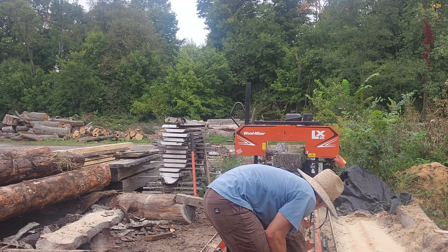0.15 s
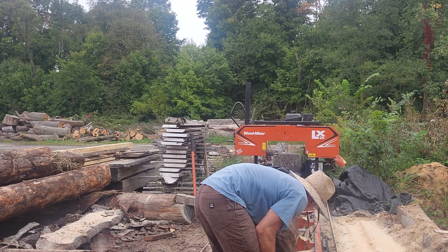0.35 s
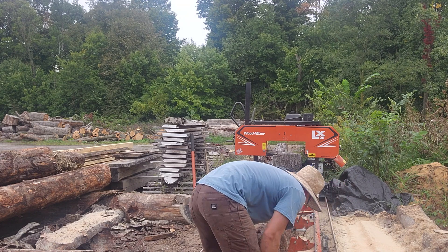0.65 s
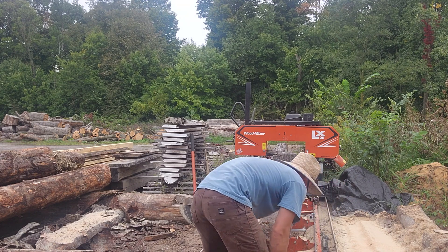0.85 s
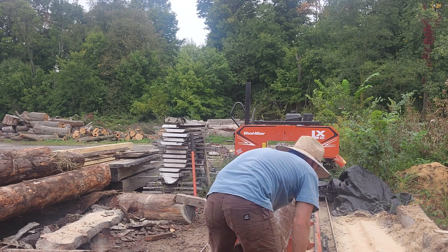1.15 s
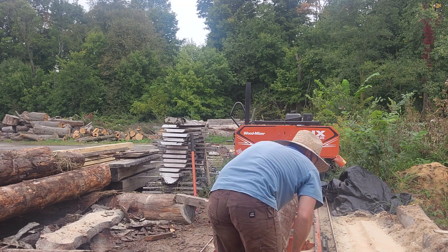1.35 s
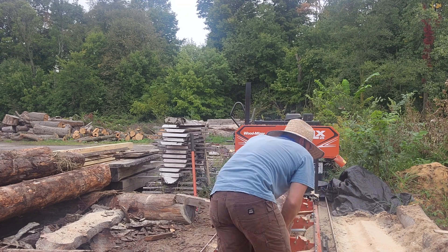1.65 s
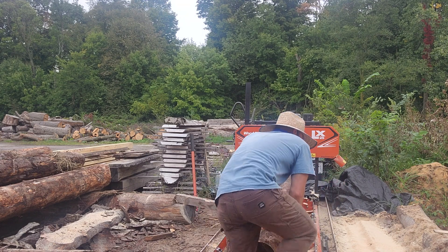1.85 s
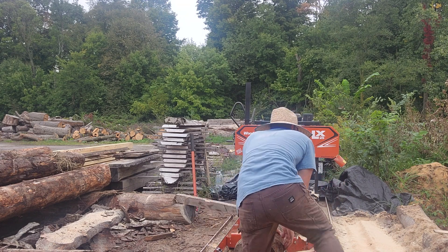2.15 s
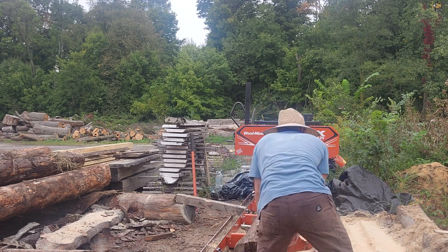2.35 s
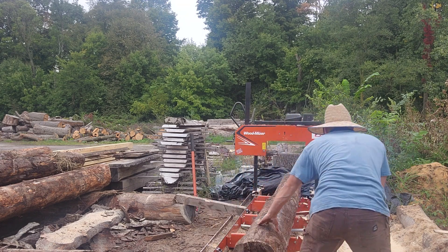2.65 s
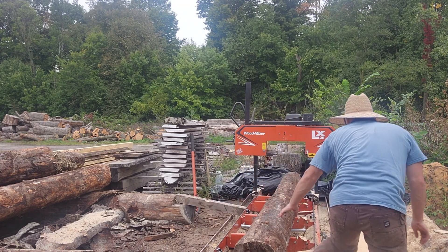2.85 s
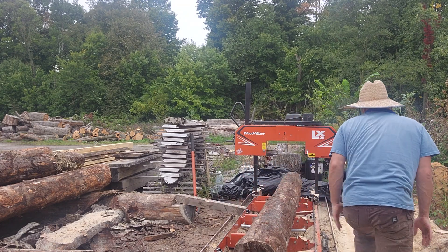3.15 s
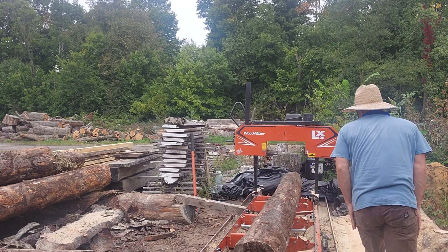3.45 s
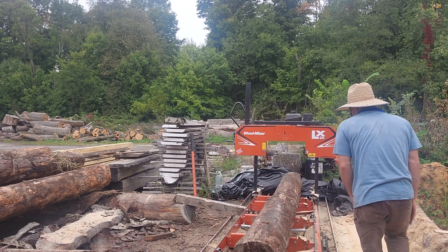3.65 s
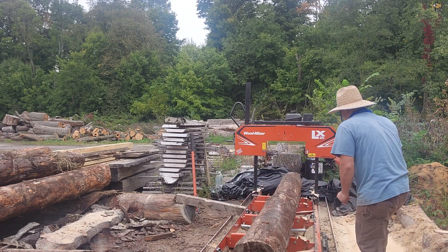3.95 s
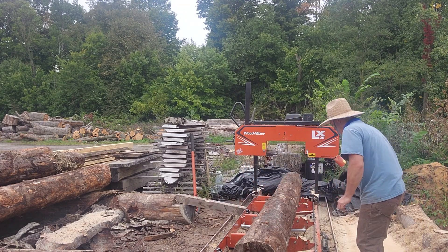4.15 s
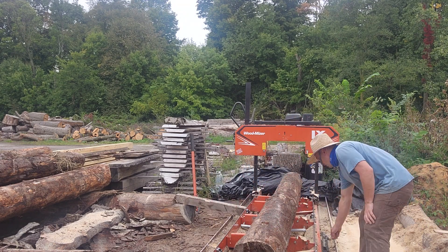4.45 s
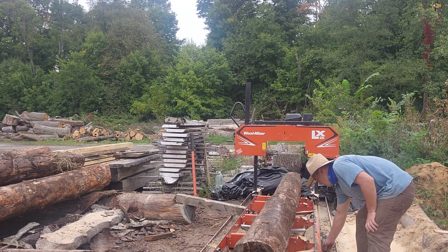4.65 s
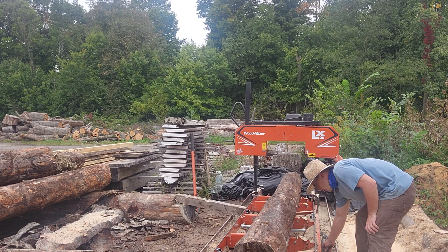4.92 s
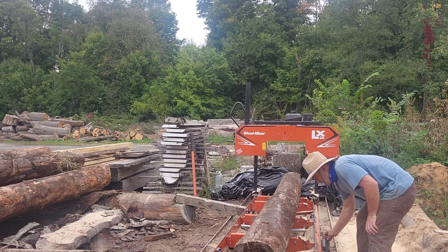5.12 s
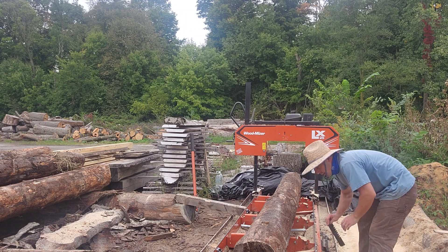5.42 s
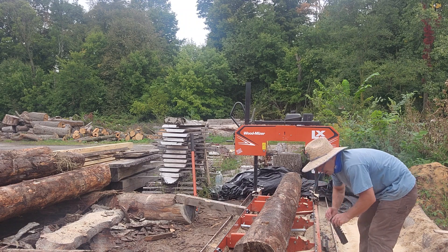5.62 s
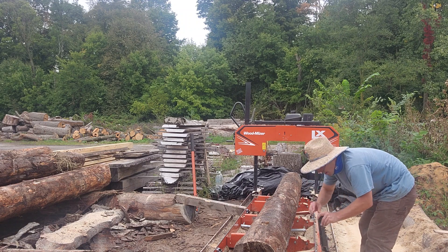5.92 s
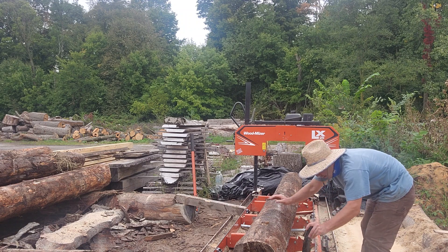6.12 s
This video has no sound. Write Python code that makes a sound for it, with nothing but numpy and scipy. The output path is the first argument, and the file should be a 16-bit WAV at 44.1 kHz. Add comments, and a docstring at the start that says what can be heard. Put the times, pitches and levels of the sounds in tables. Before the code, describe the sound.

In an open yard with soft short echoes, bark scuffs and knocks on steel rails, then a log drops with a single dominant low thud, followed by a crunchy grind and a few rocking bumps. Quieter handling follows: a dull double bump, small metal ticks and dry scuffs. Steady insect shimmer, a nearer pulsing cricket, sparse thin bird seeps and distant rumble surround it; falling chirps come near the end. The microphone is near the log.

```python
"""In a wooded sawmill yard a heavy log is rolled over and drops on the steel bed.
Landings push the damped modes of log and bed into a boom; bark catching on the cross rails grinds,
steel parts knock through modes of their own, and rubbing is grit ringing broad bark resonances under a hiss.
Insects are pulsed tones over noise bands, a near cricket trills, two small birds sing gliding sines,
and a far low rumble is shaped noise."""
import sys
import numpy as np
from scipy import signal
from scipy.fft import rfft, irfft
from scipy.io import wavfile

SR = 44100
rng = np.random.default_rng(int(sys.argv[2]) if len(sys.argv) > 2 else 0)


def ratio(d):
    """dB to gain"""
    e = np.asarray(d, float) / 20
    return 10 ** e


def int16_out(signal):
    """Quantize to a 16-bit WAV file."""
    q = np.round(np.clip(np.atleast_2d(signal).T, -1, 1) * 32767)
    wavfile.write(sys.argv[1], SR, q.astype(np.int16))


N = 276948
TIME = np.arange(N) / SR

# Modes of log and bed frame. Each row: frequency in Hz, relative level in dB,
# free decay time to -60 dB in seconds.
BED = [(51.5, 3, 0.31), (65.1, 1.5, 0.57), (89.8, -3, 0.55), (111.3, 6.5, 0.11), (166, 6, 0.066),
       (200.7, -1, 0.13), (287, -16.5, 0.81), (343, -6, 0.17), (416.5, -16, 0.43), (549, -12.5, 0.066)]
# Modes of rails and clamps. Each row: frequency in Hz, relative level in dB,
# free decay time to -60 dB in seconds.
RAILS = [(770, -4, 0.089), (1050, -15, 0.044), (1110, 1, 0.12), (1260, -2.5, 0.049), (1372, -5, 0.1),
         (1550, -6.5, 0.065), (2150, -3, 0.045), (2284, -6.5, 0.037), (3700, -4, 0.036), (4980, -3.5, 0.12)]
HELD = 0.5   # parts in contact damp each other: share of the rails' free decay time


def rms_one(x):
    """Normalisation to unit root-mean-square."""
    return x / np.sqrt(np.mean(x ** 2) + 1e-20)


def at_hz(points, hz):
    """Spectrum interpolated in dB along a logarithmic frequency axis."""
    point_hz, point_value = np.array(points).T
    return np.interp(np.log(hz), np.log(point_hz), point_value)


def drift(rate_hz):
    """Random modulation of unit spread: white noise through a critically damped low-pass."""
    step = 40   # samples between computed values
    r = np.exp(-2 * np.pi * rate_hz * step / SR)
    slow = signal.lfilter([1], [1, -2 * r, r * r], rng.standard_normal(N // step + 2002))
    slow = slow[2000:]   # the filter has settled
    return np.interp(np.arange(N) / step, np.arange(len(slow)), rms_one(slow - slow.mean()))


def ring(force, hz, t60):
    """Damped resonator: a unit click sets off a decaying sine of height 1; t60 in seconds."""
    r = ratio(-60 / (t60 * SR))
    w = 2 * np.pi * hz / SR
    return signal.lfilter([0, np.sin(w)], [1, -2 * r * np.cos(w), r * r], force + 1e-18)


def band(x, low_hz, high_hz):
    """Band-pass filtering by a Butterworth response."""
    sos = signal.butter(2, [low_hz, high_hz], "band", fs=SR, output="sos")
    return signal.sosfilt(sos, x)


def placed(x, pan_db, lag_s):
    """Stereo by level and time difference: left is pan_db stronger, right comes lag_s later."""
    right = np.interp(TIME - lag_s, TIME, x)
    return np.array([x * ratio(pan_db / 2), right * ratio(-pan_db / 2)])


def banded_noise(spectrum, patchy_db, patch_rate_hz, count):
    """Diffuse field: noise bands with partial left-right coherence and fluctuating levels; mid rms 1."""
    # Left-right likeness. Each row: frequency in Hz, likeness from 0 to 1.
    likeness = [(130, 0.97), (400, 0.87), (700, 0.063), (1500, 0.72), (4000, 0.045)]
    # Spectral balance of the channels. Each row: frequency in Hz, left over right in dB.
    leaning = [(200, .3), (400, 1.5), (800, 0), (2200, 1.5), (4900, -1.5), (9400, 4), (13000, 3)]
    edges = np.geomspace(spectrum[0][0], spectrum[-1][0], count + 1)
    hz = np.fft.rfftfreq(N, 1 / SR) + 0.0011   # keeps the logarithm finite
    alike = np.clip(at_hz(likeness, hz), 0, 1)
    mid, side = rfft(rng.standard_normal((2, N))) * ratio(at_hz(spectrum, hz))
    pair = np.sqrt(1 + alike) * mid + np.sqrt(1 - alike) * side * [[1], [-1]]
    pair *= ratio(at_hz(leaning, hz) * [[0.5], [-0.5]])
    pair[1] *= np.exp(-2j * np.pi * hz * 0.00019)   # right channel 0.19 ms later
    together = drift(patch_rate_hz / 2)
    out = np.zeros((2, N))
    for low, high in zip(edges, edges[1:]):
        flicker_db = patchy_db * (0.76 * together + drift(patch_rate_hz))
        out += ratio(flicker_db) * irfft(pair * ((hz >= low) & (hz < high)), N)
    return out / np.std(out.mean(axis=0))


def grains(per_s, spread_db):
    """Random impulse train: uneven clicks of either sign whose density fluctuates into clumps."""
    sizes = ratio(spread_db * np.minimum(rng.exponential(1, N), 4)) * rng.choice([-1, 1], N)
    density = per_s * ratio(3.0 * drift(30))
    return sizes * (rng.random(N) < density / SR)


def rumble():
    """Far broadband source: steady shaped noise whose upper part loses level with distance."""
    # Rumble spectrum. Each row: frequency in Hz, relative level per Hz in dB.
    spectrum = [(13, -40), (22, 3.5), (70, 3.5), (153, -6), (280, -24.5), (387, -16.5), (440, -22),
                (608, -26.5), (663, -23), (2420, -40.5), (2870, -49.5), (3800, -49), (8360, -120)]
    low = ratio(-56) * banded_noise(spectrum, patchy_db=0.0, patch_rate_hz=5.0, count=12)
    # the upper rumble thins as its source draws away, 0.2256 dB per second
    extra = ratio(0.2256 * (N / SR - TIME)) - 1
    return low + extra * band(low, 180, 4000)


def trill(hz, per_s):
    """Pulsed stridulation: each wing stroke is a short tone that sags in pitch; strokes differ a little."""
    stroke = np.cumsum(per_s * (1 + 0.019 * drift(17))) / SR % 1
    pitch_hz = hz * (1 + 0.012 * (0.5 - stroke) + 0.00325 * drift(18.96))
    tone = np.sin(2 * np.pi * np.cumsum(pitch_hz) / SR)
    return rms_one(tone * np.sin(np.pi * stroke) * ratio(2.0 * drift(37)))


def chorus():
    """Incoherent sum: countless far singers blur into noise bands; a dozen nearer ones stand out and fade."""
    # Blurred chorus. Each row: frequency in Hz, relative level per Hz in dB.
    spectrum = [(2120, -42.5), (3600, -30.5), (3850, -20.5), (4180, -9), (4900, -2.5), (5620, -11.5),
                (6320, -7.5), (7800, -35), (8200, -39), (9390, -27), (10800, -43.5), (14600, -35.5),
                (15800, -41)]
    blur = banded_noise(spectrum, patchy_db=1.1, patch_rate_hz=12, count=16)
    nearer = np.zeros((2, N))
    for hz, (pace, side, lag) in zip(np.linspace(4680, 5250, num=12), rng.random((12, 3))):
        song = trill(hz * (1 + 0.01 * drift(2.1)), 12 + 40 * pace)
        nearer += placed(song * ratio(5.1 * drift(7.3)), 8 * side - 7, 0.000618 * lag)
    return ratio(-64.5) * (ratio(-3.5) * blur + ratio(-3.0) * rms_one(nearer))


def cricket():
    """Stridulation as amplitude modulation: even wing strokes on a steady pitch, slower for a while."""
    pitch_hz, level_db = 4315, -73.5
    usual_per_s, slow_per_s = 55.3, 44.5
    slow_from_s, slow_to_s, change_s = 1.76, 3.32, 0.1
    slowed = (np.tanh((TIME - slow_from_s) / change_s) - np.tanh((TIME - slow_to_s) / change_s)) / 2
    per_s = (usual_per_s + (slow_per_s - usual_per_s) * slowed) * (1 + 0.02 * drift(5))
    # a stroke sounds for 0.6 of its period
    stroke = np.minimum(np.cumsum(per_s) / SR % 1 / 0.6, 1)
    sagging_hz = pitch_hz * (1 + 0.013 * (0.5 - stroke) + 0.00223 * drift(19))
    tone = np.sin(2 * np.pi * np.cumsum(sagging_hz) / SR)
    return ratio(level_db + 2.0 * drift(2.8)) * rms_one(tone * np.sin(np.pi * stroke))


def note(s, length, peak_db, start_hz, end_hz, arch_hz, swell):
    """Frequency modulation: a sine glides, its pitch bowing by arch_hz, under a sine swell to a power."""
    part = np.clip((TIME - s) / length, 0, 1)
    bow = np.abs(np.sin(np.pi * part)) * (part < 1)
    pitch_hz = start_hz + (end_hz - start_hz) * part + arch_hz * bow
    return ratio(peak_db) * bow ** swell * np.sin(2 * np.pi * np.cumsum(pitch_hz) / SR)


def birds():
    """Near-sinusoidal song: thin notes tremble and break up among the leaves at right, chirps fall at left."""
    # High thin notes. Each row: start in seconds, length in seconds, level in dB before flicker,
    # start and end pitch in Hz before arch and tremble.
    seeps = [(0.016, 0.18, -80, 8830, 8200), (0.292, 0.23, -77, 8530, 8130), (0.527, 0.12, -69, 8430, 8410),
             (1.74, 0.13, -77, 8840, 8160), (1.897, 0.134, -78, 8460, 8220), (2.3, 0.09, -87, 8400, 8700),
             (5.203, .046, -78, 7800, 7250)]
    # Falling chirps of a second bird. Each row: start in seconds, peak level in dB, start pitch in Hz.
    falling = [(6.043, -59.5, 4120), (6.088, -56.5, 4250), (6.143, -57, 4350), (6.204, -55.5, 4280)]
    tremble_hz, flicker_db = 40 * drift(80), 5.3 * drift(30)
    thin = sum(note(s, length, db + flicker_db, start_hz + tremble_hz, end_hz + tremble_hz,
                    arch_hz=143, swell=0.56)
               for s, length, db, start_hz, end_hz in seeps)
    chirps = sum(note(s, 0.0316, db, hz, hz - 298, arch_hz=0, swell=1.5) for s, db, hz in falling)
    echo = np.interp(TIME - 0.017, TIME, thin + chirps)
    direct = placed(thin, -13.0, 0.000004) + placed(chirps, 4.9, -0.000043)
    return direct + ratio(-4.5) * placed(echo, 2.9, 0.0011)


def rubbing():
    """Friction as dense impacts: grit rings the bark's broad resonances and the rails; a dry hiss rides on top."""
    # Bark, boots and sawdust rubbing. Each row: start, loudest moment and end in seconds, level in dB,
    # hiss relative to it in dB. A row that ends before its loudest moment is silent.
    rubs = np.array([(0.104, 0.183, 0.26, -60, -8), (0.193, 0.233, 0.32, -57.5, 1.5),
                     (0.635, 0.67, 0.8, -54.5, -2), (0.59, 1.087, 1.22, -71, 0.5),
                     (1.302, 1.442, 1.71, -73.5, -6), (1.726, 1.813, 1.92, -73, 5),
                     (1.908, 1.933, 2.19, -67.5, 1.5), (1.976, 2.194, 2.28, -68, -5.5),
                     (3.19, 3.626, 3.67, -75, -2), (3.697, 3.708, 3.77, -70.5, 9),
                     (4.606, 4.697, 4.8, -75.5, 3), (5.185, 5.25, 5.1, -68, 3),
                     (6.253, 6.254, 6.33, -64.5, 3.5)])
    # Bark resonances. Each row: frequency in Hz, relative level in dB.
    bark = [(600, -47), (800, -1), (1150, -4.5), (1600, -2.5), (2400, -7), (3400, -5.5)]
    shapes = np.array([np.interp(TIME, row[:3], [0, 1, 0]) for row in rubs])
    strokes = ratio(rubs[:, 3:4]) * shapes
    grit = grains(per_s=3000, spread_db=2.5)
    pitches = np.geomspace(600, 3400, num=14)
    dealt = rng.integers(0, len(pitches), N)   # each grain excites one resonance
    body = sum(ratio(at_hz(bark, hz)) * ring(grit * (dealt == k), hz, 55 / hz)
               for k, hz in enumerate(pitches))
    rails = sum(ratio(db) * ring(grit, hz, HELD * t60) for hz, db, t60 in RAILS)
    body = rms_one(body) + ratio(-5) * rms_one(rails)
    sand = grains(per_s=6000, spread_db=3)
    hiss = band(band(sand, 4500, 8700), 3600, 5740) + ratio(-20.0) * band(sand, 8200, 19000)
    # the hiss gathers at the peak of a stroke
    hiss_level = ratio(rubs[:, 4]) @ (strokes * shapes ** 1.05)
    return strokes.sum(axis=0) * rms_one(body) + hiss_level * rms_one(hiss)


def grinding():
    """Repeated catch and release: bark ridges catch on the rails and shake the upper bed modes."""
    # The log as it turns and rocks. Each row: start in seconds, length in seconds,
    # initial level in dB, fading in dB per second.
    turns = [(0.108, 0.18, -43, 60), (0.657, 0.66, -33, 117), (1.302, 0.05, -47.5, 283.5)]
    catches = band(grains(per_s=580, spread_db=-0.5), 142, 417)
    shaken = rms_one(sum(ratio(db) * ring(catches, hz, 0.42 * t60) for hz, db, t60 in BED))
    level = np.zeros(N)
    for s, length, db, fading in turns:
        edge = np.clip(np.minimum(TIME - s, s + length - TIME) / 0.009, 0, 1)   # 9 ms ramps
        level += ratio(db - fading * np.clip(TIME - s, 0, length)) * edge
    return shaken * level


def thumps():
    """Modal impact: a longer contact drives only the low modes, and a log left lying damps them."""
    # Log on the bed. Each row: start in seconds, peak level in dB, contact length in ms,
    # share of free ringing from 0 to 1.
    landings = [(0.11, -43, 1.7, 0.2), (0.6507, -7, 2.92, 0.73), (1.298, -49, 0.48, 1),
                (2.467, -38.5, 1.84, 1), (2.497, -36.5, 6.5, 0.3), (6.259, -48, 3.8, 0.7)]
    # Soft contacts: a judder over a rail, then rocking after the drop. Each row: start in seconds,
    # gap in seconds, first peak in dB, change in dB per contact, contact length in ms.
    runs = [(0.227, 0.01105, -29.5, -0.3, 5.93), (.878, .047, -40.5, -1.67, 8.9)]
    # Number of contacts in each run.
    run_contacts = (3, 6)
    # Share of free ringing in each run, from 0 to 1.
    run_free = (0.21, 0.52)
    contacts = list(landings)
    for (s, gap, db, change_db, ms), count, free in zip(runs, run_contacts, run_free):
        contacts += [(s + k * gap, db + k * change_db, ms, free) for k in range(round(count))]
    chance = rng.normal(0, 1, (len(contacts), len(BED)))   # dB, where the blow falls on each mode
    out = np.zeros(N)
    for (s, peak_db, ms, free), own_db in zip(contacts, chance):
        at, size = round(s * SR), round(ms * SR / 1000)
        push = np.zeros(SR)
        # the bed first dips away, then takes a smooth push
        push[:2 * size] = np.concatenate([-0.35 * np.hanning(size), np.hanning(size)])
        boom = sum(ratio(db + d) * ring(push, hz, free * t60) for (hz, db, t60), d in zip(BED, own_db))
        boom = band(boom, 45.5, 3700)   # the open frame radiates little below its lowest mode
        out[at:at + SR] += (ratio(peak_db) * boom / np.abs(boom).max())[:N - at]
    return out


def knocks():
    """Modal excitation by short contacts, most of them stuttering: the spot struck favours modes near one pitch."""
    # Knocks on the steel. Each row: start in seconds, peak level in dB, stutter decay in ms,
    # strongest pitch in Hz.
    blows = list([(0.112, -57.5, 4, 1590), (0.133, -49.5, 10, 770), (0.143, -52.5, 4, 1550),
                  (0.187, -49, 5, 1550), (0.196, -48, 5.5, 770), (0.215, -49, 6.4, 1550),
                  (0.229, -50, 8, 770), (0.653, -40, 19, 1070), (0.654, -47.5, 5.5, 3700),
                  (.69, -43, 6.6, 1390), (0.7305, -34, 7.9, 1110), (0.749, -50, 5.1, 1330),
                  (1.753, -61.5, 4.2, 1550), (1.94, -51.5, 65, 1220), (3.24, -58, 4.3, 1250),
                  (3.704, -49, 13, 1890), (3.739, -53.5, 9, 2280), (3.756, -48.5, 4.8, 1360),
                  (3.767, -58, 2.2, 1330), (4.389, -60.5, 21, 1030)])
    # Faint single clinks of steel, evenly spaced and slowly weakening, counted back from the last:
    # its start in seconds, step in seconds, peak in dB, rise in dB per step back,
    # stutter in ms (0: one contact), strongest pitch in Hz.
    clinks = (2, -0.35, -65, 1.0, 0, 1108.5)
    last_s, step_s, last_db, rise_db, *contact = clinks
    blows += [(last_s + k * step_s, last_db + k * rise_db, *contact) for k in range(6)]
    after, out = np.arange(SR // 4) / SR, np.zeros(N)
    chance = rng.normal(0, 1.3, (len(blows), len(RAILS)))   # dB
    for (s, peak_db, ms, best_hz), own_db in zip(blows, chance):
        stutter = np.exp(-after * 1000 / ms) * np.minimum(after / 0.0035, 1)
        force = stutter * rng.standard_normal(len(after)) * (rng.random(len(after)) < 0.1)
        force[0] = 0.33   # the first contact
        padded = band(force, best_hz / 1.5, best_hz * 1.5)   # bark pads the blow
        knock = np.zeros(len(after))
        for (hz, db, t60), d in zip(RAILS, own_db):
            octaves_off = min(abs(np.log2(hz / best_hz)), 1.4)
            knock += ratio(db + d - 24 * octaves_off) * ring(padded, hz, HELD * t60)
        # the crack of the contact
        knock += ratio(-21.0) * band(force * np.exp(-after / 0.0036), 4300, 15100)
        at = round(s * SR)
        out[at:at + len(after)] += (ratio(peak_db) * knock / np.abs(knock).max())[:N - at]
    return out


def yard(x):
    """Discrete reflections: a few dull echoes lean left and right in turn."""
    # Bed, ground, log piles and trees. Each row: delay in seconds, level in dB.
    echoes = [(.0031, -21), (.0052, -7), (.021, -15.5), (.043, -19.5)]
    dull = band(x, 520, 7500)
    return sum(ratio(db) * placed(np.interp(TIME - s, TIME, dull), 7.2 * (-1) ** k, 0.00239)
               for k, (s, db) in enumerate(echoes))


def scene():
    """Superposition of the mill in front with its echoes, and insects, birds and rumble around."""
    around = rumble() + chorus() + placed(cricket(), 3.7, 0.00018) + birds()
    rub = rubbing()
    log = grinding() + thumps()
    steel = knocks()
    near = placed(log, 1.0, 0.00003) + placed(steel, -0.55, 0.00006) + placed(rub, 1.0, 0.000018)
    return near + yard(log + steel + rub) + around


def low_pass(x):
    """Removes everything above the highest recorded frequency."""
    return signal.sosfilt(signal.butter(12, 15940, fs=SR, output="sos"), x)


def record(dry):
    """High-pass response: the microphone cuts the deepest bass."""
    mix = signal.sosfilt(signal.butter(2, 38, "high", fs=SR, output="sos"), dry)
    return low_pass(mix)


dry = scene()
out = record(dry)
int16_out(out)
```